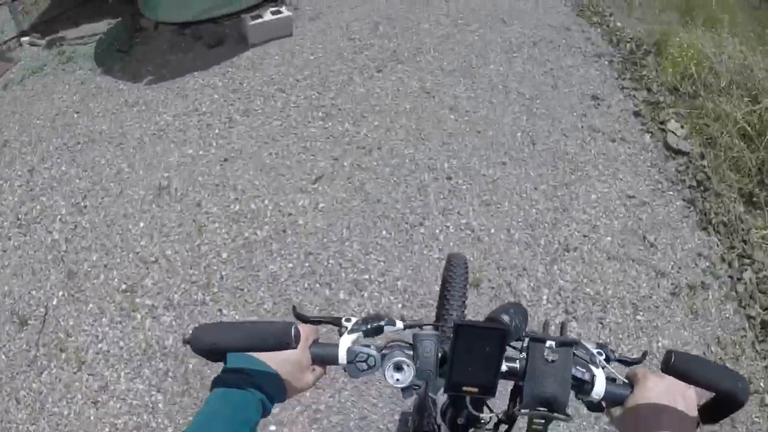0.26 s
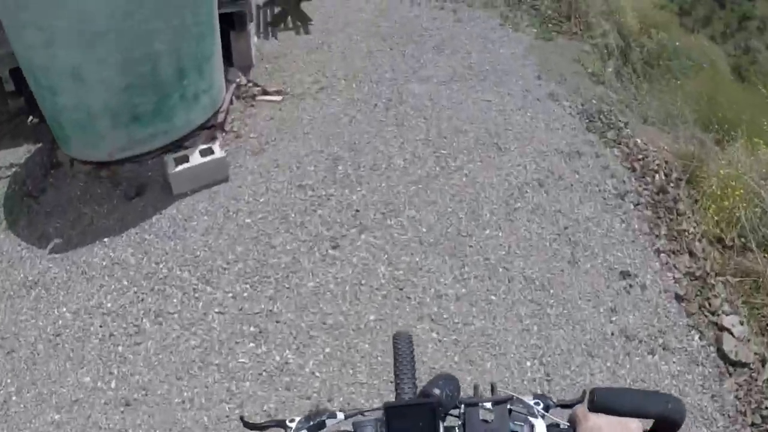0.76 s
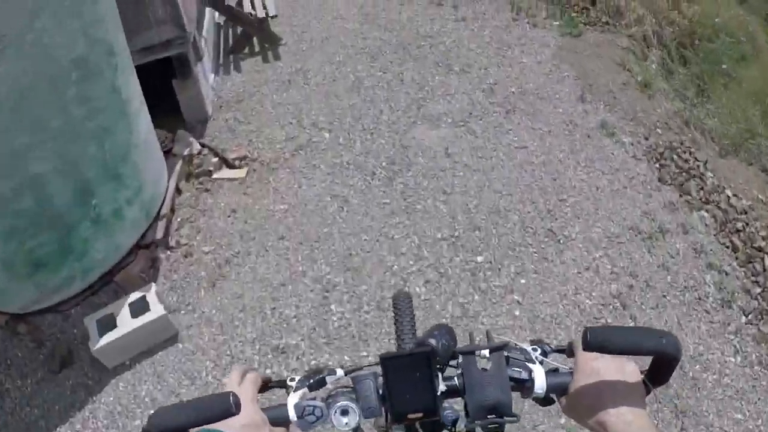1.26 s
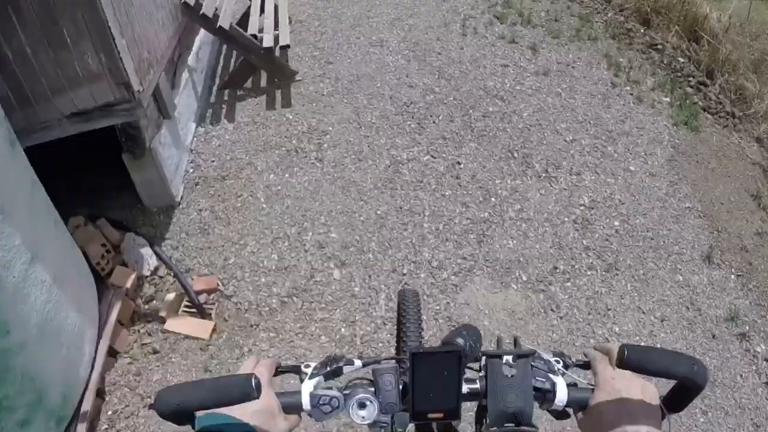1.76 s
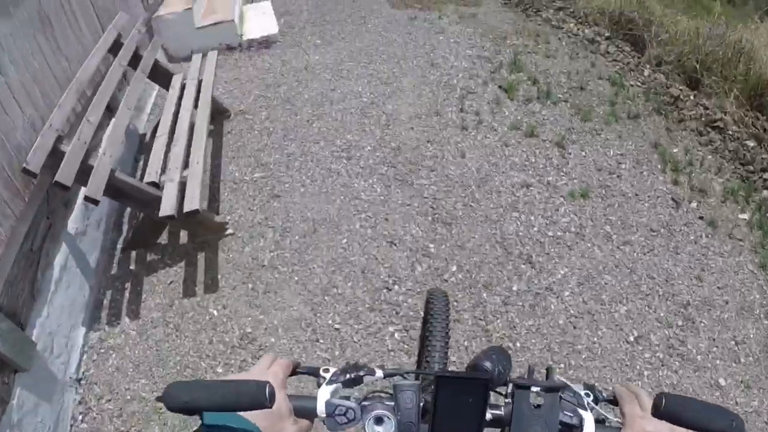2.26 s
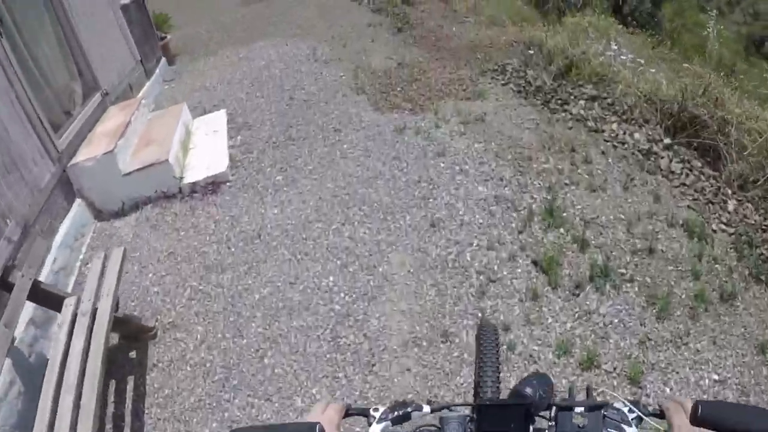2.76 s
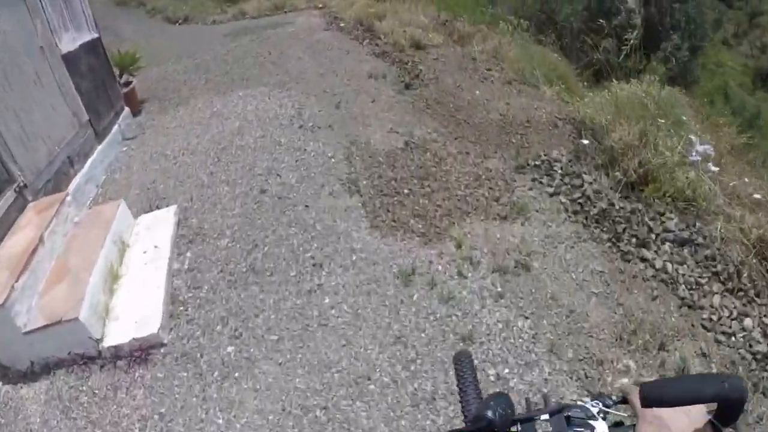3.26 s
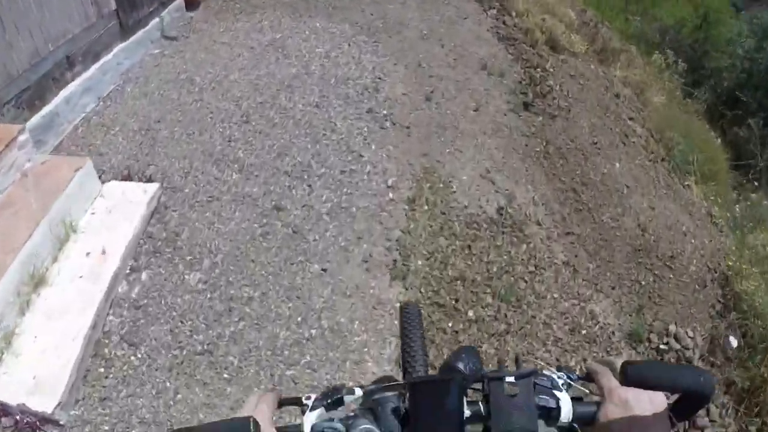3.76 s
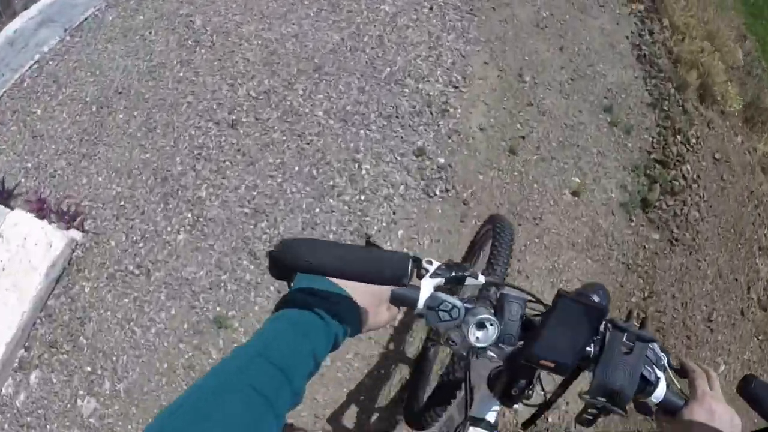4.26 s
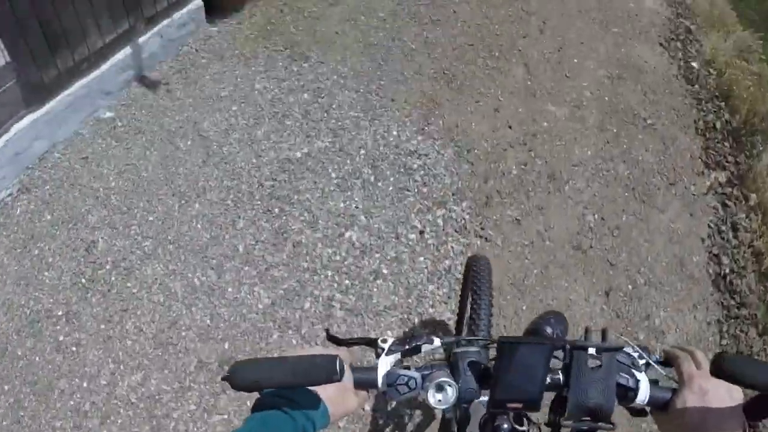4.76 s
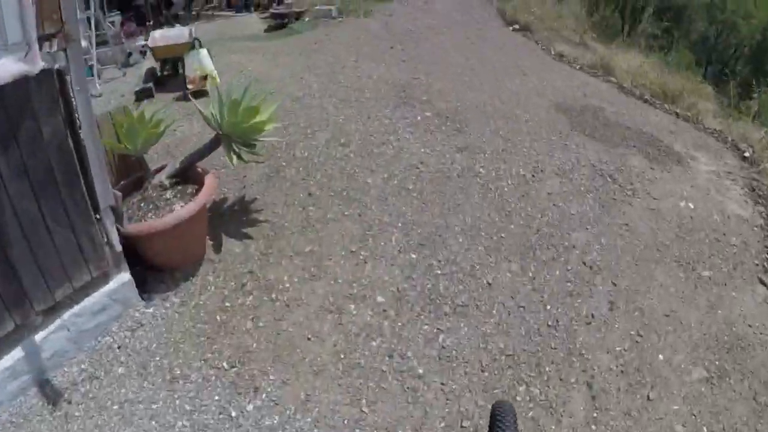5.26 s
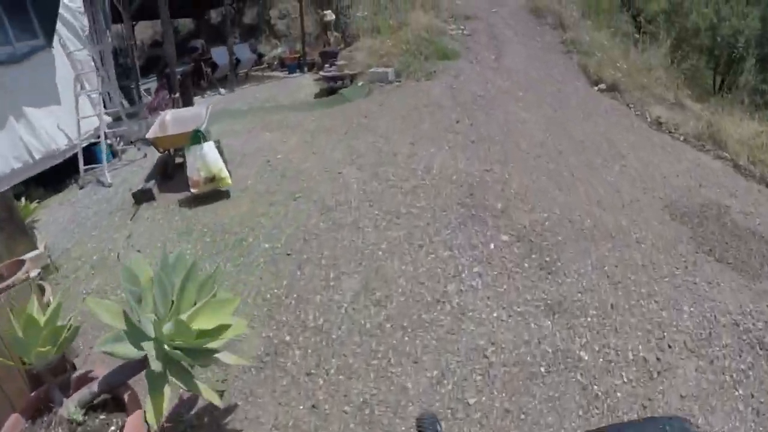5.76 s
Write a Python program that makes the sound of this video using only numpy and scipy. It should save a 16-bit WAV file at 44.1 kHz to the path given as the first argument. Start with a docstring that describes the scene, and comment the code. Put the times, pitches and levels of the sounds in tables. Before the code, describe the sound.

A bicycle rolls over loose gravel outdoors, heard from a chest microphone. Heavy low wind buffets dominate at first, with fine crackle and small bright ticks from chips underneath. Halfway through, the crunch thickens with popping stones and a disc brake hisses and hums thinly to the right. Near the end the wind falls away, leaving close, dry gravel crunch.

```python
"""Bicycle on loose gravel

Close, windy two-port microphone on the rider's chest: filtered noise buffets, swirls and roars, then drops.
Just below, trains of tiny noise cracks make the tyres rumble, crunch and crackle over the gravel.
Single stones pop from under the tread as short damped rings; chips tick on the bike as bright bursts.
Off to the right a disc brake rubs through a turn: noise hisses and drives the resonances of the disc.
"""
import sys
import numpy as np
from scipy import signal
from scipy.fft import rfft, irfft, next_fast_len
from scipy.io import wavfile
from scipy.ndimage import uniform_filter1d

SR = 44100
rng = np.random.default_rng(int(sys.argv[2]) if len(sys.argv) > 2 else 0)


def dump_mix(stems):
    """Bounce the given channels to the path in sys.argv[1] as a 16-bit WAV at rate SR."""
    frames = np.atleast_2d(stems).T  # one column per channel
    limited = np.clip(frames, -1, 1)  # hard clip at full scale
    pcm = np.round(limited * 32767).astype(np.int16)
    wavfile.write(sys.argv[1], SR, pcm)


N = 265041
TIME = np.arange(N) / SR

# Levels are those ahead of the microphone ports. Lengths of humps are full widths at 1/e of the peak.
# Air flowing past the rider: (time [s], pressure on the microphone [dB]), before light air smooths it
BREEZE_CURVE = [(0, -12), (0.78, -13), (0.95, -14), (1.15, -20.5), (1.3, -14), (1.7, -13), (1.98, -15.5),
                (2.2, -13), (2.75, -14), (2.88, -20), (3.1, -17), (3.25, -15), (3.9, -17), (4.4, -12.5),
                (4.95, -14), (5.28, -20.5), (5.42, -27), (6, -26)]
# Gusts on the microphone: (time [s], length [s], eddy level [dB], roar level [dB])
WIND_GUSTS = [(0.534, 0.23, -21, -25), (0.714, 0.14, -24, -28.5), (1.391, 0.26, -15, -25.5),
              (1.655, 0.12, -21.5, -26), (1.863, 0.067, -25, -35.5), (2.291, 0.16, -19.5, -28),
              (2.47, 0.091, -26.5, -28.5), (2.727, 0.21, -23, -38.5), (3.269, 0.16, -23.5, -45.5),
              (3.48, 0.08, -21, -41), (3.782, 0.057, -28, -40), (4.296, 0.32, -25, -37.5),
              (4.577, 0.1, -15, -35.5), (4.82, 0.15, -31, -41)]
# Filters for the slow pressure lumps, slow sway, quicker eddies and roar: (frequency [Hz], relative gain [dB])
BUFFET_SPECTRUM = [(12, -17.5), (22, -6), (33, 2.5), (50, 2.5), (70, 1), (95, -11), (140, -28)]
SWAY_SPECTRUM = [(12, -2), (25, 8), (45, -8), (65, -23), (90, -13)]
EDDY_SPECTRUM = [(55, -14.5), (85, 0.5), (120, -1.5), (170, -8), (250, -17.5), (400, -36)]
ROAR_SPECTRUM = [(150, -9), (230, 2), (330, -4.5), (450, -7), (700, -24), (1000, -43), (1600, -46.5)]
BREEZE_EDDY_DB, BREEZE_ROAR_DB = -8.5, -27.5  # plain breeze, relative to its pressure before smoothing
SMOOTH_BELOW_DB = -24.5  # under this pressure the flow turns smooth
EDDY_COLLAPSE = 3.3  # extra dB the breeze's eddies lose per dB under it; the lumps lose 1
SWAY_DB = -26.5
TEAR_DB = 4.5  # the roar comes in bursts, one on each eddy: dB per unit of eddy pressure

# Brake pads rubbing the disc: (time [s], level [dB])
BRAKE_CURVE = [(3.2, -73.5), (3.36, -50.5), (3.62, -53.5), (3.8, -42), (4.05, -42), (4.25, -39.5),
               (4.36, -44), (4.48, -52.5), (4.65, -48), (4.8, -62)]
# The disc grazing a pad as the wheel flexes: (time [s], length [s], level [dB])
DISC_GRAZES = [(0.11, 0.03, -57), (0.6, 0.059, -53), (1.675, 0.045, -54), (2.0, 0.045, -55),
               (2.338, 0.021, -51), (2.58, 0.046, -52.5), (4.52, 0.039, -48.5), (4.92, 0.12, -55.5),
               (5.99, 0.039, -50)]
# Modes of the disc: (centre frequency [Hz], width [Hz], mean relative level [dB])
DISC_MODES = [(1280, 27, 2), (1887, 41, 9.5), (2600, 61, -5), (3460, 51, 2), (4100, 74, -0.5),
              (4540, 110, -8), (6000, 250, 2)]
# Filter for the hiss of the pads: (frequency [Hz], relative gain [dB])
HISS_SPECTRUM = [(1290, -18), (2200, -4), (2600, 0), (2930, -25), (3390, -4), (3670, -9.5), (4510, -6.5),
                 (5010, -9.5), (6260, -7.5), (8550, -8.5), (9950, -15), (11400, -37.5), (13200, -27),
                 (13800, -35), (14800, -41)]
# Under the pads each mode drifts in pitch (rms share, time [s]) and in level (rms [dB] before clipping)
DISC_WANDER, DISC_WANDER_S, JUDDER_DB = .012, .05, 3

# Chips striking the bike: (time [s], peak level [dB], frequency of strongest filter gain [Hz])
CHIP_TICKS = [(0.2697, -22, 8200), (0.5421, -37, 4670), (1.038, -37, 5800), (1.0529, -20.5, 5800),
              (1.056, -27, 5800), (1.2255, -37, 6000), (1.3033, -31, 5180), (1.309, -34, 6000),
              (1.6261, -31, 7500), (1.6801, -31, 5600), (1.7783, -36, 4530), (1.8476, -37, 5260),
              (2.9381, -32, 5780), (3.1367, -35, 5450), (3.386, -34, 5200), (3.5103, -31, 5440),
              (5.308, -33, 7800), (5.461, -33, 6800)]
# Filter for a tick brightest at 6 kHz, shifted for the others: (frequency [Hz], gain [dB])
CHIP_SPECTRUM = [(1000, -18.5), (2200, 3.5), (6000, 5), (9000, -2), (11500, -21.5), (17000, -8)]

# Loudest stones squeezed out by the tread:
# (time [s], reference level [dB], ring pitch [Hz], tyre knock relative to that level [dB])
STONE_POPS = [(0.3292, -35, 1900, -12), (0.608, -36, 2800, -12), (0.7138, -33, 1700, -10),
              (0.8478, -29, 2350, -17), (1.1877, -25, 1750, -6), (1.2256, -26.5, 1870, 6),
              (1.3848, -30, 2100, -8), (1.5678, -28, 1960, -10), (1.6801, -32, 1600, -6),
              (1.9041, -30, 2600, -9), (1.9754, -31, 2020, -12), (2.143, -20, 1800, -8),
              (2.3326, -29, 1490, 1), (2.4219, -32, 1890, -10), (2.7791, -24, 1800, -8),
              (2.8079, -23, 2050, -18), (2.994, -33, 1900, -3), (3.0574, -30, 1800, -6),
              (3.0833, -17.5, 1880, -16), (3.1373, -21.5, 2200, -12), (3.1961, -29, 1980, -12),
              (3.2415, -29, 1910, -10), (3.2755, -19.5, 1930, -7), (3.3418, -27, 1550, -1),
              (3.5109, -21.5, 1430, 1), (3.6147, -27, 1800, -12), (3.6327, -20.5, 1950, -3),
              (3.716, -27, 1690, -8), (3.7663, -26, 2340, -8), (3.9305, -22.5, 1300, -1),
              (3.9963, -21, 1910, -5), (4.0482, -26, 1300, -3), (4.0817, -15.5, 1850, -5),
              (4.093, -25, 2100, -3), (4.3575, -27, 2230, -10), (4.3908, -20, 1350, -3),
              (4.4204, -22, 2050, -10), (4.589, -30, 1900, 0), (4.8374, -28, 1780, -12),
              (5.1348, -26, 2200, -9), (5.1437, -25, 1610, -11), (5.1584, -25, 1870, -13),
              (5.3014, -24, 2400, -9), (5.3308, -24, 2160, -4), (5.3642, -25, 1900, -10),
              (5.376, -24, 2350, -12), (5.446, -26, 1940, -5), (5.5043, -14.5, 1920, -8),
              (5.5393, -22, 1950, -10), (5.5692, -23, 2480, -2), (5.756, -27, 1800, -3),
              (5.8431, -29, 1880, -10), (5.8925, -27, 2050, -12), (5.961, -29, 1900, 7)]
# Modes of the tyre's knock under a stone, detuned afresh each time:
# (nominal frequency [Hz], relative level [dB], decay [s])
KNOCK_MODES = [(390, -2, .006), (530, -7, .006), (660, -5, .0035)]
SCATTER_HZ = (900, 2650)  # band of the snap and of the scatter around each stone
RING_S, RING_RISE_S = .0016, .0004  # decay and rise of a large stone's ring
RING_DB, SNAP_DB, SCATTER_DB = -2.5, -8, -7.5  # relative to the stone's reference level
# Smaller pebbles: reference level over the crunch curve [dB], ring pitch [Hz]
PEBBLES_PER_S, PEBBLE_DB, PEBBLE_HZ = 95, (6, 15), (1150, 3200)
PEBBLE_KNOCK_DB, PEBBLE_RING_S = -14, .0006

# How hard the tyres work the gravel: (time [s], crunch level [dB], rumble level of the knobs [dB])
ROLLING_CURVE = [(0, -47.5, -30), (0.2, -51.5, -45), (0.42, -52, -40), (0.52, -58, -36), (0.68, -50, -49),
                 (0.81, -51.5, -43.5), (0.98, -56.5, -45), (1.03, -53, -36), (1.22, -55, -37.5),
                 (1.33, -51, -36.5), (1.55, -54, -36), (1.69, -51.5, -38), (1.73, -58, -33.5),
                 (1.83, -59, -45.5), (1.88, -54, -39), (2.02, -46.5, -36), (2.25, -51.5, -40),
                 (2.45, -53, -42), (2.68, -51.5, -40.5), (2.85, -51.5, -40), (2.94, -50.5, -38),
                 (3.22, -48.5, -35.5), (3.42, -48.5, -32.5), (3.7, -47, -33), (4.05, -47, -27.5),
                 (4.36, -46, -29.5), (4.62, -50.5, -35.5), (4.92, -49.5, -35.5), (5.06, -54.5, -39.5),
                 (5.285, -51, -40.5), (5.305, -45.5, -32.5), (5.54, -49.5, -30.5), (5.64, -45.5, -31),
                 (6, -45.5, -33.5)]
# Fine grit crackling under the tread: (time [s], level [dB])
GRIT_CURVE = [(0, -47), (0.12, -56), (0.17, -55.5), (0.36, -57), (0.48, -59), (0.66, -57.5), (0.8, -59),
              (0.85, -60), (0.99, -59.5), (1.08, -57), (1.25, -55), (1.32, -52), (1.48, -54.5), (1.68, -53),
              (1.725, -60), (1.83, -57.5), (1.92, -51.5), (2.13, -53.5), (2.2, -55.5), (2.46, -54.5),
              (2.7, -59.5), (2.82, -54), (3.08, -53), (3.29, -55.5), (3.37, -53.5), (4.3, -49),
              (4.66, -53.5), (4.78, -53.5), (4.88, -50), (5.05, -54.5), (5.16, -53), (5.275, -54),
              (5.31, -48), (5.57, -50), (5.7, -48.5), (5.9, -52), (6, -47)]
# The tread shoves a heap of stones aside: (time [s], length [s], crunch level [dB])
HEAP_SHOVES = [(0.735, 0.019, -47), (0.92, 0.033, -50), (1.145, 0.014, -51.5), (1.315, 0.011, -43.5),
               (1.39, 0.019, -46.5), (1.578, 0.074, -48.5), (1.875, 0.05, -46), (2.143, 0.027, -48),
               (3.066, 0.03, -42.5), (3.285, .03, -46), (3.638, 0.026, -51), (4.065, 0.029, -37.5),
               (5.152, 0.076, -43), (5.312, 0.026, -45.5), (5.378, 0.025, -53), (5.42, 0.048, -45.5),
               (5.45, 0.038, -44.5), (5.535, 0.07, -44), (5.775, 0.02, -41)]
# Filters for the rumble, crunch and grit: (frequency [Hz], relative gain [dB])
RUMBLE_SPECTRUM = [(60, -4.5), (130, -1.5), (250, 6.5), (340, 2.5), (450, -4), (495, 0.5), (528, 2.5),
                   (560, -2), (640, -1), (740, -12.5), (900, -21.5), (1400, -18.5)]
CRUNCH_SPECTRUM = [(700, 0.5), (850, 0), (1000, -0.5), (1130, -5), (1260, -2), (1470, -3), (1750, -0.5),
                   (1910, 1.5), (2080, 0), (2450, 0), (2800, -4), (3150, -5), (3550, -16), (4200, -20)]
GRIT_SPECTRUM = [(2600, 0.5), (3050, -10.5), (3600, -9.5), (4050, -5), (5000, -9.5), (5900, -5), (6200, -7),
                 (6470, -7), (6800, -8), (7600, -10), (8800, -15.5), (11000, -25.5), (13200, -33),
                 (14800, -39)]
SHOVED_GRIT_DB = -22  # the grit that slides with a heap, relative to its crunch
PATCH_DB, PATCH_S = 1.0, .025  # looser and firmer patches: rms spread before clipping, time to cross one
STONE_HZ, STONE_Q = (700, 3600), 2.2  # pitches of the grinding stones, sharpness of their resonance

# The two microphone ports: (frequency [Hz], likeness [0 to 1])
PORT_LIKENESS = [(30, .998), (150, .975), (350, .91), (800, .88), (1200, .68), (2000, .8), (4000, .55),
                 (7000, .3), (14000, .4)]
# Left port against right, before any shading: (frequency [Hz], level difference [dB])
PORT_LEAN = [(30, 1.5), (100, -1.1), (300, -3.5), (600, -9), (820, -4.5), (1250, -7), (1650, 2), (1950, -7),
             (2250, 2.5), (2700, -2), (4500, -0.5), (9000, -2.5), (12000, -0.5)]
# Phase by which the left port leads: (frequency [Hz], phase [rad])
PORT_LEAD = [(30, 0), (380, 0.31), (520, -0.14), (800, 4), (1400, 3.5), (1750, 1.5), (2150, -4.5),
             (2500, -5.5), (4000, -5.5), (5300, -7.5), (9000, -8.5), (14000, -15)]
EDGE_HZ = 15000  # upper band limit


def amp(db):
    """Turns decibels into an amplitude factor."""
    return 10 ** (np.asarray(db) / 20)


def evened(x):
    """Scales to an rms of 1."""
    return x / np.sqrt(np.mean(x ** 2) + 1e-20)


def noise():
    """Two independent channels of white noise."""
    return rng.standard_normal((2, N))


def read(points, hz):
    """Joins a table of (frequency [Hz], value) on a log-frequency axis."""
    f, value = np.transpose(points)
    return np.interp(np.log(hz + 1), np.log(f + 1), value)


def follow(rows):
    """Gives the columns of a curve table at every sample."""
    s, *columns = np.transpose(rows)
    return [np.interp(TIME, s, column) for column in columns]


def swell(rows):
    """Sums smooth humps of (time [s], length [s], peak level [dB]) into one gain curve."""
    return sum(amp(db) * np.exp(-(2 * (TIME - s) / length) ** 2) for s, length, db in rows)


def drift(seconds):
    """A smooth random curve that changes within the given time; rms 1."""
    window = np.hanning(int(2 * seconds * SR))
    return evened(signal.oaconvolve(rng.standard_normal(N), window, "same"))


def add(mix, s, sound):
    """Mixes a two-channel sound in at time s."""
    part = mix[:, max(round(s * SR), 0):][:, :sound.shape[1]]
    part += sound[:, :part.shape[1]]


def colour(x, spectrum, size=8192):
    """Minimum-phase filter with the given gains, falling 30 dB per octave past its ends; rms 1."""
    hz = abs(np.fft.fftfreq(size, 1 / SR)) + 1
    octaves_above = np.maximum(np.log2(hz / spectrum[-1][0]), 0)
    octaves_below = np.maximum(np.log2(spectrum[0][0] / hz), 0)
    gain_db = read(spectrum, hz) - 30 * (octaves_above + octaves_below)
    log_gain = np.log(amp(np.maximum(gain_db, -100)))
    # the Hilbert transform of the log gain gives the phase of a causal filter
    taps = np.fft.ifft(np.exp(np.conj(signal.hilbert(log_gain)))).real[:size // 2]
    return evened(signal.oaconvolve(x, taps[None], axes=1)[:, :N])


def resonance(x, hz, width):
    """One resonant mode, fixed or moving, driven by x; rms 1."""
    turn = np.exp(2j * np.pi * np.cumsum(hz * np.ones(N)) / SR)
    r = np.exp(-np.pi * width / SR)
    # shift the mode down to 0 Hz, smooth, shift back
    return evened((turn * signal.lfilter([1 - r], [1, -r], x / turn)).real)


def steadied(x, seconds):
    """Evens out the slow swells of a noise, leaving its fast flutter."""
    power = uniform_filter1d(x ** 2, max(int(seconds * SR), 2), axis=1)
    return x / np.sqrt(abs(power) + 1e-4)


def crack(t, decay_s, tail_db, tail_s):
    """A stone's brief rough crack and the fainter shifting of its neighbours, as decaying noise."""
    envelope = np.exp(-t / decay_s) + amp(tail_db) * np.exp(-t / tail_s)
    return rng.standard_normal((2, len(t))) * envelope


def grains(per_s, spread_db, decay_s, tail_db, tail_s, clump_db, pitch_hz=None, count=20):
    """Many kinds of grain crack at random, most small, a few large, in clumps; with pitch_hz each kind rings."""
    t, out = np.arange(1500) / SR, np.zeros((2, N))
    clumps = amp(clump_db * evened(uniform_filter1d(rng.standard_normal(N), SR // 30)))
    size = amp(spread_db * np.minimum(rng.exponential(1, N), 4.5)) * clumps
    starts = rng.random(N) < per_s / SR
    kind = rng.integers(0, count, N)
    pitches = np.linspace(*pitch_hz, count) if pitch_hz else None
    for k in range(count):
        grain = crack(t, decay_s, tail_db, tail_s)
        if pitch_hz:
            grain = evened(signal.lfilter(*signal.iirpeak(pitches[k], STONE_Q, fs=SR), grain))
        strikes = size * starts * (kind == k)
        out += signal.oaconvolve(strikes[None], grain, axes=1)[:, :N]
    return out


def wind():
    """Slow pressure lumps and quicker eddies press on the microphone; hard gusts break into a ragged roar."""
    pressure_db, = follow(BREEZE_CURVE)
    buffet = steadied(colour(noise(), BUFFET_SPECTRUM), seconds=0.088)
    eddies = steadied(colour(noise(), EDDY_SPECTRUM), seconds=0.14)
    roar = steadied(colour(noise(), ROAR_SPECTRUM), seconds=0.052)
    sway = steadied(colour(noise(), SWAY_SPECTRUM), seconds=0.49)
    # in light air the lumps and the breeze's eddies fade further, and the steady slow sway shows
    calm_db = np.minimum(pressure_db - SMOOTH_BELOW_DB, 0)
    ragged = evened(amp(TEAR_DB * np.clip(eddies[0], -2, 2)))
    gust_eddies = swell((s, length, db) for s, length, db, _ in WIND_GUSTS)
    gust_roar = swell((s, length, db) for s, length, _, db in WIND_GUSTS)
    eddy_gain = amp(pressure_db + BREEZE_EDDY_DB + EDDY_COLLAPSE * calm_db) + gust_eddies
    roar_gain = amp(pressure_db + BREEZE_ROAR_DB) + gust_roar
    return (amp(pressure_db + calm_db) * buffet + eddy_gain * eddies
            + roar_gain * ragged * roar + amp(SWAY_DB) * sway)


def brake():
    """Pad friction hisses and sets the modes of the disc humming; a light graze sounds only a high mode."""
    level_db, = follow(BRAKE_CURVE)
    friction = noise()
    ring = np.zeros((2, N))
    for hz, width, db in DISC_MODES:
        judder_db = JUDDER_DB * np.clip(drift(DISC_WANDER_S), -2, 2)
        moving_hz = hz * (1 + DISC_WANDER * drift(DISC_WANDER_S))
        ring += amp(db + judder_db) * resonance(friction, moving_hz, width)
    hiss = colour(grains(per_s=2200, spread_db=1.8, decay_s=0.0007, tail_db=-14, tail_s=0.0045,
                         clump_db=1.1), HISS_SPECTRUM)
    graze = resonance(resonance(friction, hz=6500, width=550), hz=6600, width=2200)
    rub = amp(-5.0) * hiss + amp(-6.5) * evened(ring)
    return amp(level_db) * rub + swell(DISC_GRAZES) * graze


def ticks():
    """Chips hit hard parts of the bike: a bright crack of a few milliseconds with a fainter tail."""
    t, out = np.arange(SR // 20) / SR, np.zeros((2, N))
    hz = np.fft.rfftfreq(len(t), 1 / SR) + 1
    for s, db, bright_hz in CHIP_TICKS:
        shape = amp(read(CHIP_SPECTRUM, hz * 6000 / bright_hz))
        burst = crack(t, decay_s=.0013, tail_db=-21, tail_s=.007)
        burst = np.roll(burst, SR // 1000, axis=1)  # 1 ms of space ahead of the onset
        tick = irfft(rfft(burst) * shape, len(t))
        add(out, s, amp(db) * tick / abs(tick[0]).max())
    return out


def stone(db, hz, knock_db, ring_s=RING_S):
    """A stone snaps free with a few cycles of ring, a knock from the tyre and a little scatter."""
    t = np.arange(SR // 20) / SR
    band = signal.butter(3, SCATTER_HZ, "band", fs=SR, output="sos")
    snap = signal.sosfilt(band, np.exp(-t / .00015))
    ring = np.sin(2 * np.pi * hz * t) * np.exp(-t / ring_s) * (1 - np.exp(-t / RING_RISE_S))
    knock = np.zeros(len(t))
    for mode_hz, mode_db, decay_s in KNOCK_MODES:
        detuned_hz = mode_hz * rng.uniform(.92, 1.08)
        knock += amp(mode_db) * np.exp(-t / decay_s) * np.sin(2 * np.pi * detuned_hz * t)
    scatter = signal.sosfilt(band, crack(t, decay_s=2 * ring_s, tail_db=-11, tail_s=9 * ring_s))
    pop = amp(SCATTER_DB) * scatter / abs(scatter).max()
    # ring, snap and knock go only into the signal that both ports share
    pop[0] += amp(RING_DB) * ring / abs(ring).max()
    pop[0] += amp(SNAP_DB) * snap / abs(snap).max()
    pop[0] += amp(knock_db) * knock
    return amp(db) * pop


def pops():
    """Large stones pop from under the tread; small pebbles click at random, each at its own pitch."""
    out = np.zeros((2, N))
    for s, *row in STONE_POPS:
        add(out, s, stone(*row))
    crunch_db, _ = follow(ROLLING_CURVE)
    for when, size, pitch in rng.random((int(PEBBLES_PER_S * N / SR), 3)):
        at = int(when * N)
        db = crunch_db[at] + np.interp(size ** 2, [0, 1], PEBBLE_DB)  # squared: mostly small ones
        hz = np.interp(pitch, [0, 1], PEBBLE_HZ)
        add(out, at / SR, stone(db, hz, PEBBLE_KNOCK_DB, PEBBLE_RING_S))
    return out


def tyres():
    """Knobs drum on the ground; stones grind and grit crackles, in looser and firmer patches."""
    crunch_db, rumble_db = follow(ROLLING_CURVE)
    grit_db, = follow(GRIT_CURVE)
    rumble = colour(grains(per_s=1000, spread_db=1.5, decay_s=0.0025, tail_db=-10.5, tail_s=0.0064,
                           clump_db=1.8), RUMBLE_SPECTRUM)
    crunch = colour(grains(per_s=650, spread_db=3.6, decay_s=.0009, tail_db=-19, tail_s=.012,
                           clump_db=1.2, pitch_hz=STONE_HZ), CRUNCH_SPECTRUM)
    grit = colour(grains(per_s=2400, spread_db=2.6, decay_s=0.0009, tail_db=-13, tail_s=0.012,
                         clump_db=1.3), GRIT_SPECTRUM)
    patch_db = PATCH_DB * np.clip(drift(PATCH_S), -2, 2)
    shoved = swell(HEAP_SHOVES)
    crunch_gain = amp(crunch_db + patch_db) + shoved
    grit_gain = amp(grit_db + patch_db) + amp(SHOVED_GRIT_DB) * shoved
    return (amp(rumble_db) * steadied(rumble, seconds=0.25)
            + crunch_gain * steadied(crunch, seconds=0.073)
            + grit_gain * steadied(grit, seconds=0.16))


def ports(x, shade_db=0):
    """Turns a shared and an unshared signal into two ports, whose housing tilts level and phase.

    A source off to the right is quieter at the left port, by about shade_db up to 3 kHz
    and about half that from 9 kHz.
    """
    size = next_fast_len(N + SR // 10)
    hz = np.fft.rfftfreq(size, 1 / SR)
    shared, apart = rfft(x, size)
    same = np.clip(read(PORT_LIKENESS, hz), 0, 1)
    shadow_db = shade_db * read([(3000, 0.97), (9000, 0.47)], hz)
    left_gain = amp(read(PORT_LEAN, hz) - shadow_db) * np.exp(1j * read(PORT_LEAD, hz))
    left = left_gain * (same * shared + np.sqrt(1 - same ** 2) * apart)
    # dividing by this keeps the sum of both ports flat
    centre = np.sqrt(1 + abs(left_gain) ** 2 + 2 * same * left_gain.real) / 2
    return irfft(np.array([left, shared]) / np.maximum(centre, .1), size)[:, :N]


def scene():
    """Wind, tyres, stones, chips and brake as they reach the chest; chips and brake lie to the right."""
    ahead = ports(wind() + tyres() + pops())
    return ahead + ports(ticks(), shade_db=2.5) + ports(brake(), shade_db=12.0)


def record(dry):
    """Rounds off the strongest buffets, below about 400 Hz, then limits the band."""
    low = signal.sosfiltfilt(signal.butter(2, 400, fs=SR, output="sos"), dry)
    ceiling = .82  # the low band never exceeds this amplitude
    rounded_low = low / (1 + (low / ceiling) ** 4) ** (1 / 4)
    band_limit = signal.firwin(511, EDGE_HZ, window=("kaiser", 9), fs=SR)
    return signal.oaconvolve(dry - low + rounded_low, band_limit[None], "same")


dry = scene()
out = record(dry)
dump_mix(out)
```